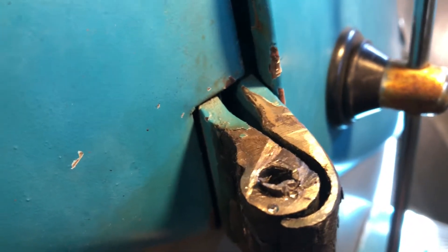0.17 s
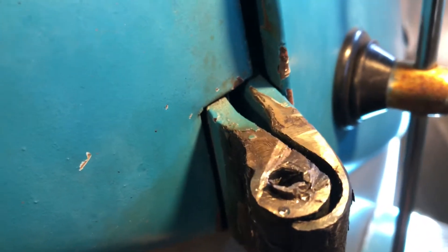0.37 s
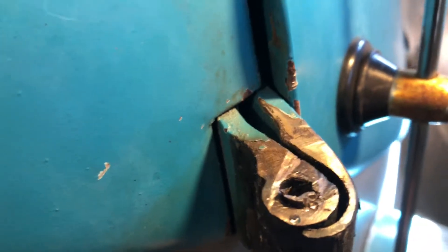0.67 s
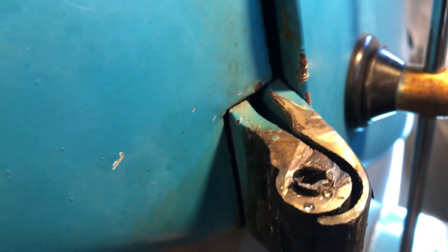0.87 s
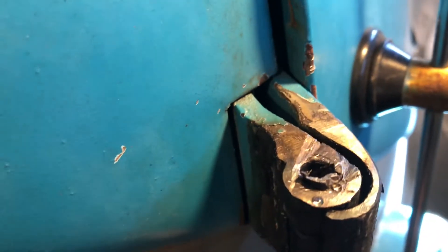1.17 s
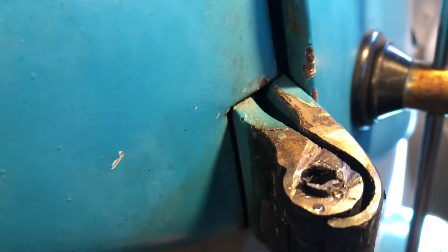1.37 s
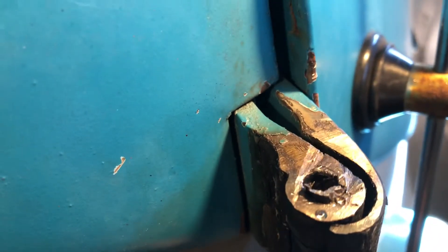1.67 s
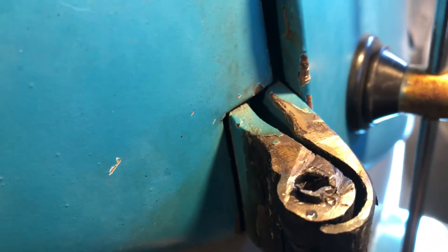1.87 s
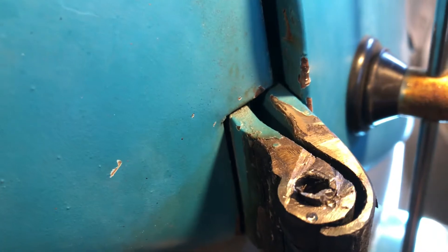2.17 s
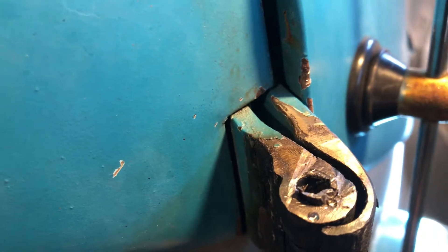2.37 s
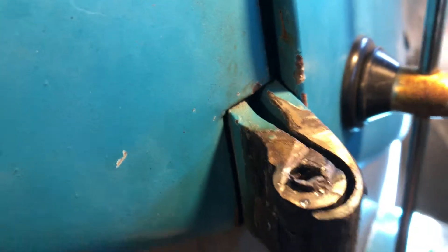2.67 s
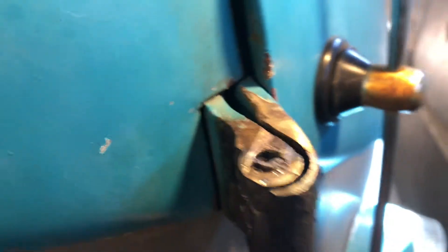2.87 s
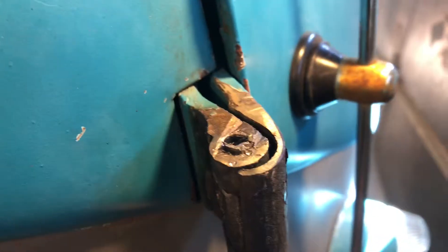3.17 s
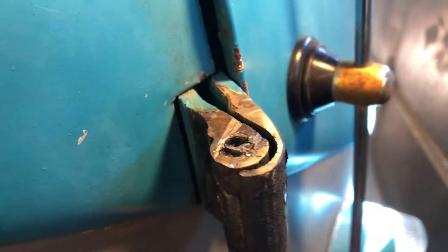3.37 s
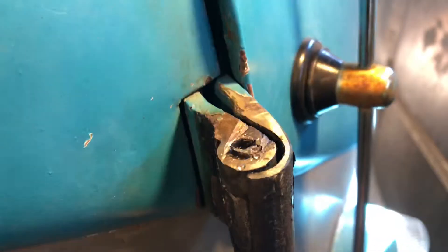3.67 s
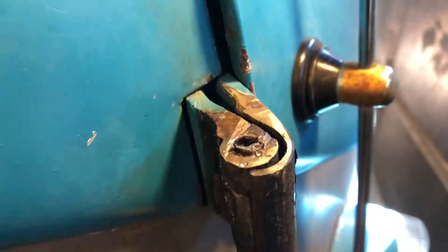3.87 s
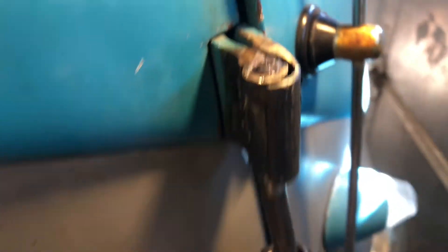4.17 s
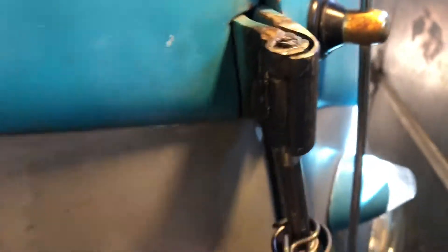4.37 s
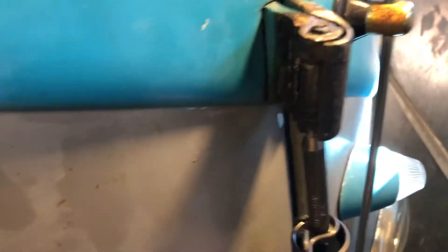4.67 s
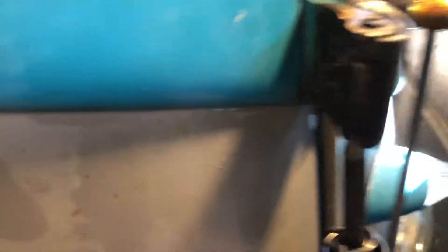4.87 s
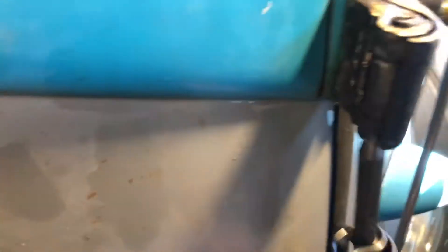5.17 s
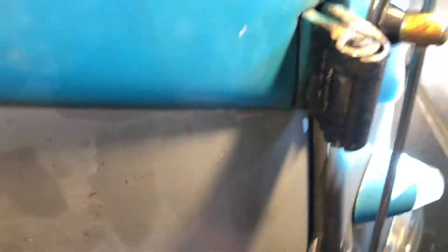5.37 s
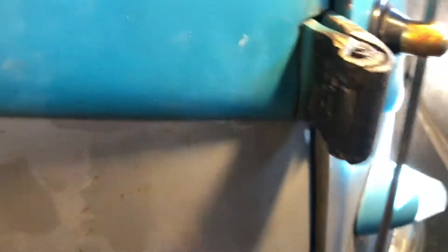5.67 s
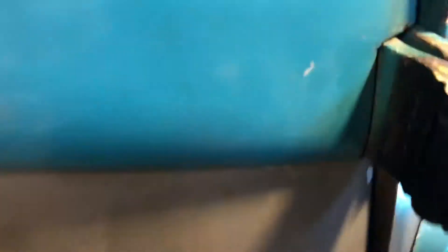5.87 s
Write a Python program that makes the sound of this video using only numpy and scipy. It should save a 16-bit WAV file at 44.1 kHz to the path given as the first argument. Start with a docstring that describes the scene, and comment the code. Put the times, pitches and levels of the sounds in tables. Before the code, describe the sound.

Two bursts of machine-fast steel hammering, about forty blows a second, ring through a hinge and door panel, very near the microphone and loud enough to crowd it. A short gap with a soft knock separates them. After the second cuts off, the echo dies quickly and a steady compressor hum with hiss rises as the recording level recovers, dotted by tiny clinks and light knocks.

```python
"""Air hammer on a stuck hinge pin

Close up in a garage, an air hammer pounds a steel hinge pin in two bursts of about 41 blows a second,
the first already under way. Each cycle is a puff of exhaust, a clank through pin, hinge and door,
modelled as struck resonances, and a weaker return puff. A compressor, built from harmonics and hiss,
cuts in under the second burst; its hum swells afterwards as the recorder's gain recovers.
The tool knocks on the door between bursts, and knocks and clinks lightly as it is taken away."""
import sys
import numpy as np
from scipy import signal
from scipy.fft import rfft, irfft, next_fast_len
from scipy.io import wavfile
from scipy.ndimage import uniform_filter1d

SR = 44100
rng = np.random.default_rng(int(sys.argv[2]) if len(sys.argv) > 2 else 0)


def master(y):
    """Save y as 16-bit WAV."""
    cut = np.clip(np.atleast_2d(y).T, -1, 1)
    pcm = np.round(cut * 32767)  # scale
    wavfile.write(sys.argv[1], SR, pcm.astype(np.int16))


N = 265437
LEAD = SR // 4   # samples of run-in: the hammer is already running at time zero
T = np.arange(-LEAD, N) / SR   # seconds

# All table levels are relative dB. Noise colours give power density.
# Faint air of the place. Each row: frequency in Hz, level in dB.
STILL_AIR = [(24, -41), (40, -12), (298, 0), (824, -20), (1030, -12.5), (1820, -22), (4230, -20.5),
             (15000, -43)]

# Trigger pulls. Each row: first blow in seconds, release in seconds.
TRIGGER_PULLS = [(-0.1669, 0.512), (0.9392, 3.865)]
# Piston speed, shifting as the tool is leaned on. Each row: time in seconds, blows per second.
CRUISE_SPEED = [(0.14, 40.81), (0.35, 41.92), (1.34, 40.55), (1.46, 41.88), (2.05, 41.9), (2.34, 40.87),
                (3.33, 41.14), (3.63, 39.42)]
# A fresh pull races the piston in light strokes; letting go slows and weakens it.
RACE_PER_S, RACE_S, RACE_LOSS_DB = 5.82, .1126, 2.0   # extra blows per second, time scale, loss
STALL_PER_S, STALL_S, STALL_LOSS_DB = 18.8, .0192, 3.5   # missing blows per second, time scale, loss
PRESSURE_SAG_DB_PER_S = 1.16   # the hose pressure falls while the trigger is held
JITTER_S = .00003   # no two strokes take quite the same time
# The chisel bounces on the pin in every cycle. Each row: seconds after the blow, level in dB.
CHISEL_BOUNCES = [(.01225, -9), (.01633, -7)]
# Door panel. Each row: frequency in Hz, width in Hz, level in dB, arrival in seconds after the blow.
DOOR_MODES = [(540, 84, -16, .012), (720, 31, -10, 0.00353), (888.6, 39, -5, .0127),
              (974, 44, -10.5, 0.00073), (1083, 14.5, 0.5, .01455), (1200.3, 20, -0.5, .0174),
              (1264, 45, -13, .006), (1314, 15, 1.5, .00415), (1422.4, 41, -6, .012),
              (1527.4, 28.4, 0, .0077), (1577, 47, -5, .0144), (1774, 53, -13, .0067),
              (1878, 16, -6, 0.00241)]
# Chisel and pin. Each row: frequency in Hz, width in Hz, level in dB.
STEEL_MODES = [(2152, 56, -1.5), (2317, 45, 1.5), (2573, 18, 0.5), (2918, 31, -6.5), (2925, 223, -7.5),
               (3215, 150, -7.5), (3384, 52, -8), (3700, 57, -26), (4070, 47, -9), (4670, 140, -4),
               (5680, 90, -8), (5945, 110, -5), (6510, 100, -10), (6990, 110, -13), (7680, 84, -11),
               (9320, 410, -14), (11640, 570, -13), (13600, 740, -15.5)]
# Brightness of the steel as the chisel works into the pin. Each row: time in seconds, tilt in dB per octave.
SEATING_TILT = [(0.3, 2), (1.2, 2), (2.0, 1), (2.6, 1.5), (3.1, 2), (3.5, 2.5), (3.85, 2.5)]
# Short chisel rings. Each row: frequency in Hz, width in Hz, level in dB, dB gained per dB of seating tilt.
CHISEL_PINGS = [(2282, 200, -36, -4), (2983, 220, -31, -4), (3356, 200, -44, 6), (4756, 170, -37, 0.5),
                (5853, 220, -37.5, 3.5)]
# Low boom of the panel. Each row: time in seconds, level in dB.
BOOM_LEVEL = [(1.0, -10), (1.9, 3), (2.02, 9), (2.25, 7), (2.45, -2), (3.2, 1.5), (3.8, 1)]
# Gritty contact, also heard in the thud and the air rush. Each row: frequency in Hz, level in dB.
CRUNCH_COLOUR = [(25, -16.5), (60, -4.5), (130, -2.5), (300, 0.5), (700, -1.5), (1400, -7), (2500, -2),
                 (4000, -6.5), (7000, -1), (11000, -7.5), (16000, -23.5)]
# Exhaust air. Each row: frequency in Hz, level in dB.
EXHAUST_COLOUR = [(100, -14), (400, -2.5), (2000, 2), (4500, -3), (7500, -9), (9500, -3), (10600, -3),
                  (12000, -2.5), (13700, 2.5), (15800, -0.5)]

# Decay of the garage. Each row: frequency in Hz, time to fall 60 dB in seconds.
GARAGE_T60 = [(100, 0.93), (500, 0.55), (2000, 0.63), (5000, 0.54), (9000, 0.14), (15000, 0.15)]
# Colour of the garage's tail. Each row: frequency in Hz, level in dB.
GARAGE_COLOUR = [(60, -12), (500, 11.5), (900, -1), (1300, -4), (2800, 1), (4500, 2), (9000, 2),
                 (15000, -0.5)]

# Light knocks of the tool on the door. Each row: start in seconds, level in dB, contact pitch in Hz.
KNOCKS = [(0.686, -14, 700), (5.11, -27, 110), (5.3235, -6, 1695), (5.3335, -13.5, 254), (5.95, -26, 348),
          (5.985, -26, 300)]
# What a knock rings. Each row: frequency in Hz, width in Hz, level in dB.
KNOCK_MODES = [(158, 56, -4), (332, 43, -4.5), (810, 115, 2.5), (1140, 170, -6.5), (1360, 200, -1.5),
               (1755, 55, -1.5), (2280, 83, -10), (3440, 380, -12.5), (5500, 1400, -20)]

SHAFT_HZ = 57.65   # compressor shaft, turns per second
CUT_IN_S, RUN_UP_S = 2, 0.32   # start of the compressor, time to reach full level
# Compressor tank and housing, colouring the hum. Each row: frequency in Hz, width in Hz, level in dB.
TANK_MODES = [(58, 30, -10.5), (190, 40, -11), (373.6, 42.6, 1), (462, 60, -9), (554.3, 30, 8.5),
              (752, 170, -18), (1010, 117, -12), (1328, 25, -12.5), (1520, 90, -17.5), (1900, 550, -25)]
# Valve chatter. Each row: frequency in Hz, level in dB.
VALVE_COLOUR = [(1800, -42), (2250, 2), (2900, -2), (3500, 6.5), (4800, -16), (5900, -5), (8300, -17),
                (9200, -6.5), (10400, -19), (11700, -14), (13300, -22), (14900, -11.5)]
# Compressor intake hiss. Each row: frequency in Hz, level in dB.
INTAKE_COLOUR = [(30, -25), (70, -12), (130, 0), (290, -7), (400, 1), (550, 5), (680, -9.5), (1050, 0),
                 (1200, -0.5), (1450, -0.5), (2000, -7), (3000, -11.5), (6500, -14.5), (11000, -23.5),
                 (15500, -25)]

# Clinks of loose steel. Each row: start in seconds, level in dB, contact pitch in Hz.
CLINKS = [(4.613, -23, 14000), (4.62, -25, 7000), (5.514, -25, 9503), (5.523, -20, 4502)]
# What a clink rings. Each row: frequency in Hz, width in Hz, level in dB.
CLINK_MODES = [(4080, 500, 4), (5950, 150, 0), (7770, 61, 6), (9900, 70, 1.5), (14000, 2500, -12)]

# Brief whirs. Each row: centre in seconds, half length in seconds, frequency in Hz, width in Hz, level in dB.
WHIRS = [(5.08, .16, 1890, 70, -46), (6.0, 0.13, 2850, 600, -46)]

CUTOFF_HZ = 15800   # top of the recorder's range


def from_db(db):
    """Decibels to gain."""
    return 10 ** (np.asarray(db) / 20)


def rms_one(x):
    """Scale to rms 1."""
    return x / np.sqrt(np.mean(x ** 2) + 1e-20)


def in_time(curve):
    """Read a curve of (seconds, value) at every sample."""
    s, value = np.transpose(curve)
    return np.interp(T, s, value)


def at_hz(points, hz):
    """Read a spectrum on a log-frequency axis."""
    f, value = np.transpose(points)
    return np.interp(np.log(np.maximum(hz, 1)), np.log(f), value)


def noise(colour):
    """Steady noise of a given colour, rms 1, shaped in the frequency domain."""
    size = next_fast_len(len(T))
    hz = np.arange(size // 2 + 1) * SR / size
    spectrum = rfft(rng.standard_normal(size)) * from_db(at_hz(colour, hz))
    return rms_one(irfft(spectrum, size)[:len(T)])


def clicks(times, db):
    """One impulse for each contact."""
    out = np.zeros(len(T))
    out[np.round(np.asarray(times) * SR).astype(int) + LEAD] = from_db(db)
    return out


def resonate(x, hz, width):
    """Two-pole resonance with gain 1 on top; a wider one dies sooner."""
    r = np.exp(-np.pi * width / SR)
    feedforward = np.array([1, 0, -1]) * (1 - r * r) / 2
    feedback = [1, -2 * r * np.cos(2 * np.pi * hz / SR), r * r]
    return signal.lfilter(feedforward, feedback, x + 1e-18)


def resonate_twice(x, hz, width):
    """Two equal resonances in a row: a ring that swells briefly before it decays."""
    return resonate(resonate(x, hz, width), hz, width)


def still_air():
    """The faint, steady noise behind everything."""
    return noise(STILL_AIR)


def trigger(first, release):
    """How much the piston races around a pull and stalls towards the release, each 0-1."""
    race = np.exp(-((T - first) / RACE_S) ** 2)
    stall = np.exp(np.minimum(T - release, 0) / STALL_S)
    return race, stall


def blow_times():
    """The piston lands once for every full cycle while the trigger is held."""
    times = []
    for first, release in TRIGGER_PULLS:
        race, stall = trigger(first, release)
        speed = in_time(CRUISE_SPEED) + RACE_PER_S * race - STALL_PER_S * stall
        held = (T >= first) & (T < release)
        cycles = np.cumsum(speed[held]) / SR
        whole_cycles = np.arange(int(cycles[-1]) + 1)
        times.append(np.interp(whole_cycles, cycles, T[held]))
    blows = np.concatenate(times)
    return blows + JITTER_S * rng.standard_normal(len(blows))


def drive():
    """How hard the piston hits: light while racing, then sagging with the pressure, weakest on release."""
    db = np.zeros(len(T))
    for first, release in TRIGGER_PULLS:
        race, stall = trigger(first, release)
        loss_db = RACE_LOSS_DB * race + PRESSURE_SAG_DB_PER_S * (T - first) + STALL_LOSS_DB * stall
        db = np.where(T > first - RACE_S, -loss_db, db)
    return from_db(db)


def puffs(times, rise_s, spread_db):
    """Bursts of pressure: an envelope that swells for rise_s after each time and then dies away."""
    age = np.arange(SR // 20) / SR / rise_s
    starts = clicks(times, spread_db * rng.standard_normal(len(times)))
    return signal.oaconvolve(starts, age * np.exp(1 - age))[:len(T)]


def exhaust(blows):
    """Air let out in a puff just ahead of the blow, a leak after it and a weaker return-stroke puff."""
    power_stroke = puffs(blows - .0023, rise_s=0.0009, spread_db=0.7)
    leak = from_db(-23) * puffs(blows + 0.0023, rise_s=0.0045, spread_db=1.2)
    return_stroke = from_db(-13) * puffs(blows + 0.012, rise_s=0.0013, spread_db=1.0)
    return rms_one((power_stroke + return_stroke + leak) * noise(EXHAUST_COLOUR))


def crunch(blows):
    """Grit between the steel faces: a short burst of noise about each blow."""
    return rms_one(puffs(blows - .0014, rise_s=0.0023, spread_db=0.3) * noise(CRUNCH_COLOUR))


def struck(blows, modes, spread_db, tilt_db=0):
    """Each blow rings every mode (Hz, width, dB, arrival) at its own strength; tilt is dB per octave."""
    out = 0
    for k, (hz, width, db, arrival) in enumerate(modes):
        tilted_db = db + tilt_db * np.log2(hz / 3300)
        strength_db = tilted_db + spread_db * rng.standard_normal(len(blows))
        out = out + (-1) ** k * resonate(clicks(blows + arrival, strength_db), hz, width)
    return rms_one(out)


def steel_ring(blows):
    """Chisel and pin ring, their brightness following how the chisel sits."""
    modes = [(hz, width, db, .0002) for hz, width, db in STEEL_MODES]
    tilt = np.interp(blows, *np.transpose(SEATING_TILT))
    return struck(blows, modes, spread_db=0.1, tilt_db=tilt)


def pings(blows):
    """The chisel's own short rings; their balance shifts upwards as the seating tilt grows."""
    tilt, out = np.interp(blows, *np.transpose(SEATING_TILT)), 0
    for hz, width, db, tilt_gain in CHISEL_PINGS:
        force = clicks(blows - .0002, tilt_gain * tilt)
        out = out + from_db(db) * rms_one(resonate_twice(force, hz, width))
    return out


def bouncing(blows, spread_db):
    """The force of each blow followed by that of its weaker bounces."""
    out = 0
    for delay, db in [(0, 0)] + CHISEL_BOUNCES:
        out = out + clicks(blows + delay, db + spread_db * rng.standard_normal(len(blows)))
    return out


def hinge_clank(force):
    """The hinge gives one short clank: two broad resonances in a row."""
    return rms_one(resonate(resonate(force, hz=1335, width=290), hz=1270, width=350))


def door_thud(force):
    """The whole door is jolted: contacts of uneven strength ring one deep resonance."""
    return rms_one(resonate(force * noise(CRUNCH_COLOUR), hz=75.2, width=48))


def panel_boom(force):
    """The panel's low boom, two broad resonances in a row, waxing and waning."""
    boom = rms_one(resonate(resonate(force, hz=265, width=260), hz=255, width=290))
    return from_db(in_time(BOOM_LEVEL)) * boom


def inrush():
    """Air rushes into the cylinder, building up to the second burst's first blow."""
    ahead = TRIGGER_PULLS[1][0] - T
    rush = from_db(-1500 * np.abs(ahead)) * (ahead > 0) * (ahead < .025)
    return rush * noise(CRUNCH_COLOUR)


def hammer():
    """Exhaust puffs and steel on steel, all scaled by how hard the piston hits, plus the air rush."""
    blows = blow_times()
    force = bouncing(blows + .00064, spread_db=0.65)
    air = from_db(-20.5) * exhaust(blows) + from_db(-25.5) * crunch(blows)
    steel = from_db(-24.5) * steel_ring(blows) + pings(blows)
    clank = from_db(-23) * hinge_clank(force)
    door = from_db(-24) * struck(blows, DOOR_MODES, spread_db=0.75)
    low = from_db(-45.0) * (door_thud(force) + panel_boom(force))
    return drive() * (air + steel + clank + door + low) + from_db(-25.5) * inrush()


def garage(x, near_db, near_t60, tail_db):
    """Quick scatter from the door and nearby panels, then the room's tail, dying sooner in the treble."""
    age = np.arange(int(.8 * SR)) / SR
    edges = np.geomspace(40, 18000, 16)   # Hz
    white, tail = rng.standard_normal((3, len(age))), 0
    for k, (low, high) in enumerate(zip(edges, edges[1:])):
        hz = np.sqrt(low * high)
        bandpass = signal.butter(2, [low, high], "band", fs=SR, output="sos")
        band = signal.sosfilt(bandpass, white[k % 2])
        decay_db = -60 * age / at_hz(GARAGE_T60, hz)
        tail = tail + band * from_db(at_hz(GARAGE_COLOUR, hz) + decay_db)
    near = white[2] * from_db(-60 * age / near_t60) * (age > .001)
    tail = tail * (age > .01)
    echo = from_db(near_db) * near / np.linalg.norm(near) + from_db(tail_db) * tail / np.linalg.norm(tail)
    return x + signal.fftconvolve(x, echo)[:len(x)]


def taps(events, modes):
    """Light contacts, soft or hard by their pitch, ring a set of modes; a 0 dB contact peaks at 1."""
    out = np.zeros(len(T) + SR // 4)
    for s, level_db, contact_hz in events:
        force = resonate(signal.unit_impulse(SR // 4), contact_hz, contact_hz)
        ring = 0
        for k, (hz, width, db) in enumerate(modes):
            ring = ring + (-1) ** k * from_db(db) * resonate(force, hz, width)
        start = round(s * SR) + LEAD
        out[start:start + len(ring)] += from_db(level_db) * ring / np.abs(ring).max()
    return out[:len(T)]


def handling():
    """The tool knocks on the door and loose steel clinks, heard in the garage."""
    contacts = from_db(-2.5) * taps(KNOCKS, KNOCK_MODES) + taps(CLINKS, CLINK_MODES)
    return garage(contacts, near_db=-5.5, near_t60=0.084, tail_db=-21.0)


def tank_hum(turn, count):
    """Multiples of the shaft rate, as strong as tank and housing pass them; phases are random, rms 1."""
    hz, width, db = np.transpose(TANK_MODES)
    out = 0
    for k in range(1, count + 1):
        gain = np.linalg.norm(from_db(db) / (1 + (2 * (k * SHAFT_HZ - hz) / width) ** 2))
        out = out + gain * np.sin(k * turn + 2 * np.pi * rng.random())
    return rms_one(out)


def compressor():
    """A steady comb on the shaft rate, valves that chatter alike on every turn, and throbbing intake hiss."""
    turn = 2 * np.pi * SHAFT_HZ * T
    hum = tank_hum(turn, count=42)
    one_turn = noise(VALVE_COLOUR)[:round(SR / SHAFT_HZ)]
    chatter = np.resize(one_turn, len(T))   # repeats the same turn
    hiss = noise(INTAKE_COLOUR) * (1 + 0.17 * np.cos(turn))
    running = np.clip((T - CUT_IN_S) / RUN_UP_S, 0, 1)
    return running * (from_db(-26.0) * hum + from_db(-46.5) * chatter + from_db(-39.5) * hiss)


def whirs():
    """A faint whir swells briefly: narrow bands of hiss that rise and fade."""
    out = 0
    for s, half, hz, width, db in WHIRS:
        swell = np.exp(-((T - s) / half) ** 2)
        band = rms_one(resonate_twice(rng.standard_normal(len(T)), hz, width))
        out = out + from_db(db) * swell * band
    return out


def scene():
    """The hammer close by in the garage, the compressor fainter and without echo, still air behind."""
    pounding = from_db(18.5) * garage(hammer(), near_db=-13, near_t60=0.17, tail_db=-21.5)
    background = from_db(-60.5) * still_air()
    mix = pounding + handling() + compressor() + whirs() + background
    return mix[None, LEAD:]


def gain_control(x, target_db, recovery_db_per_s):
    """The gain drops at once for loud sound and creeps back up afterwards."""
    power = uniform_filter1d(x ** 2, size=3230, axis=-1)   # averaged over 73 ms
    level_db = 10 * np.log10(np.maximum(power, 1e-12))
    ramp = recovery_db_per_s * np.arange(N) / SR
    held_db = np.maximum.accumulate(level_db + ramp, axis=-1) - ramp
    return x * from_db(np.minimum(0, target_db - held_db))


def record(dry):
    """The microphone sheds deep bass; gain control, rounded peaks, and a steep cut at the top."""
    low_cut = signal.butter(2, 30, "high", fs=SR, output="sos")
    picked_up = signal.sosfilt(low_cut, dry)
    levelled = gain_control(picked_up, target_db=-13.0, recovery_db_per_s=7.0)
    rounded = levelled / (1 + np.abs(levelled / .9) ** 4) ** (1 / 4)
    top_cut = signal.ellip(12, .2, 80, CUTOFF_HZ, fs=SR, output="sos")
    return signal.sosfilt(top_cut, rounded)


dry = scene()
out = record(dry)
master(out)
```